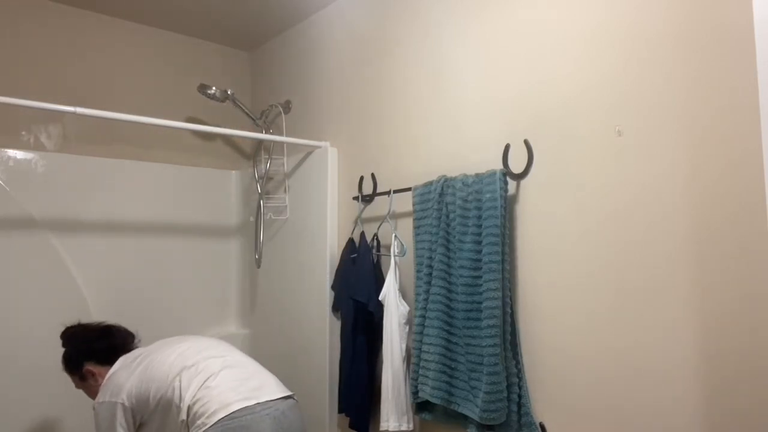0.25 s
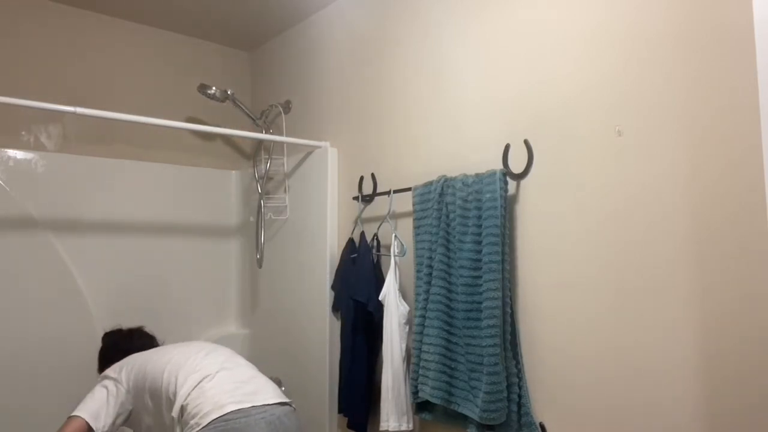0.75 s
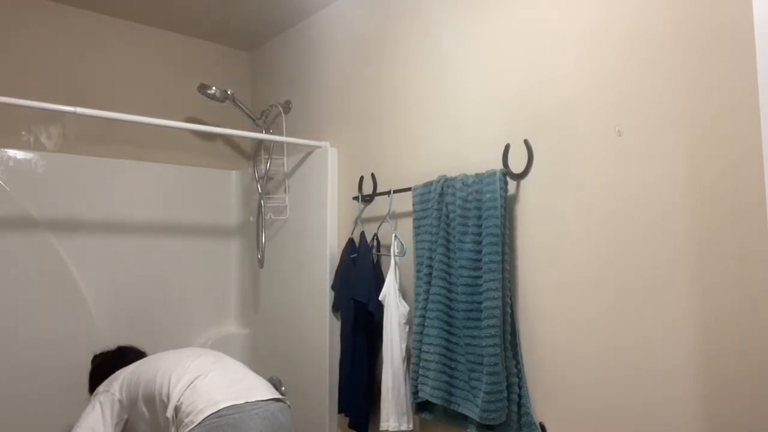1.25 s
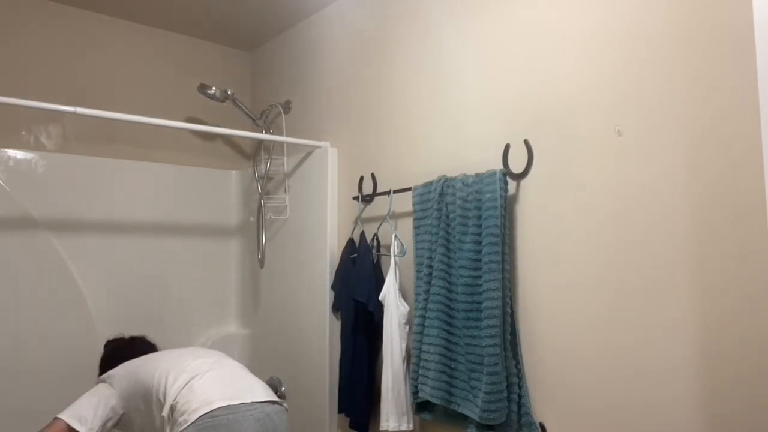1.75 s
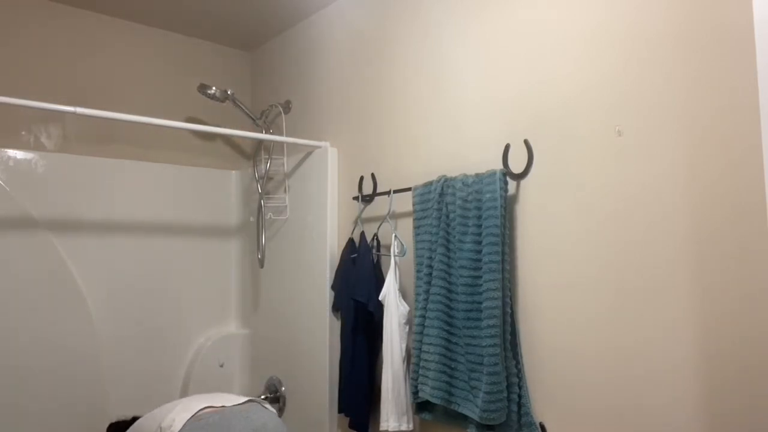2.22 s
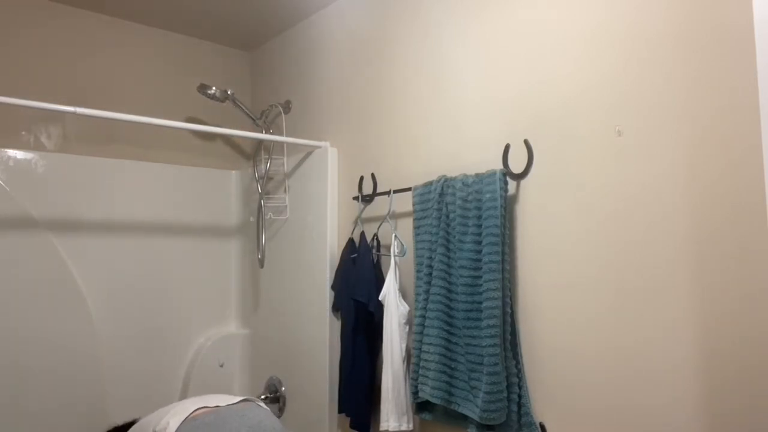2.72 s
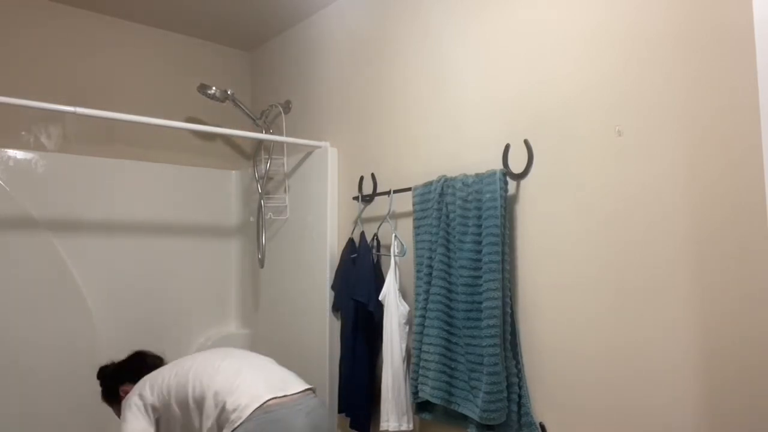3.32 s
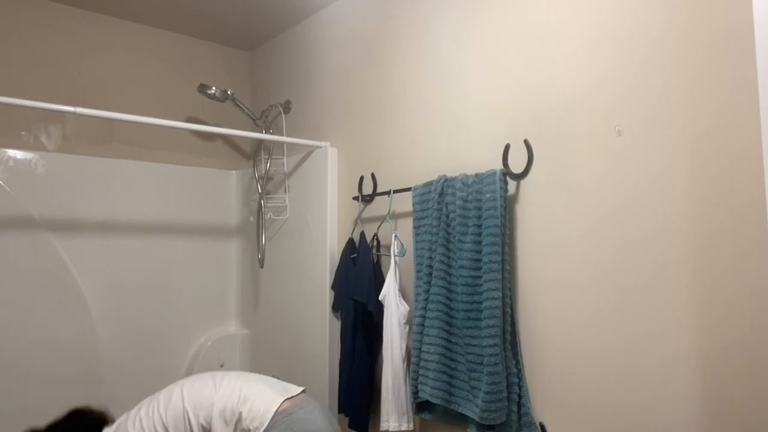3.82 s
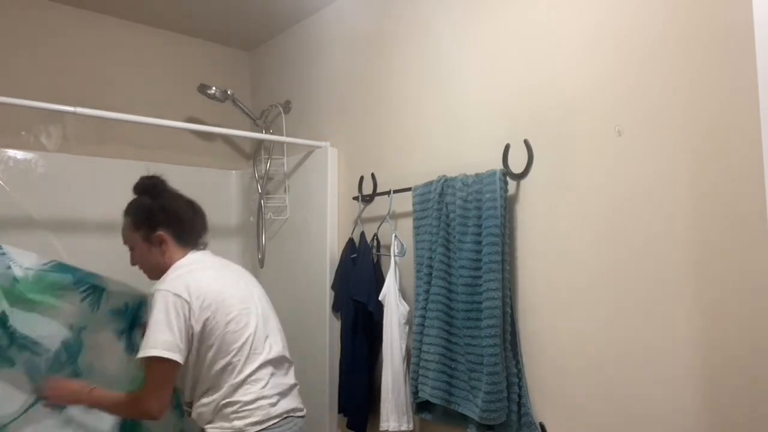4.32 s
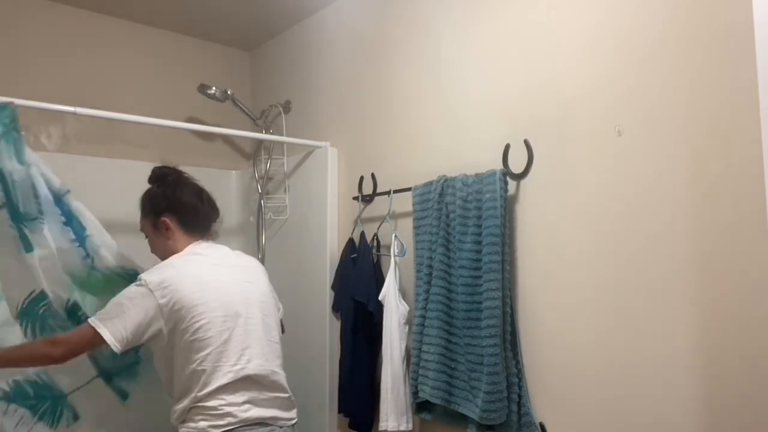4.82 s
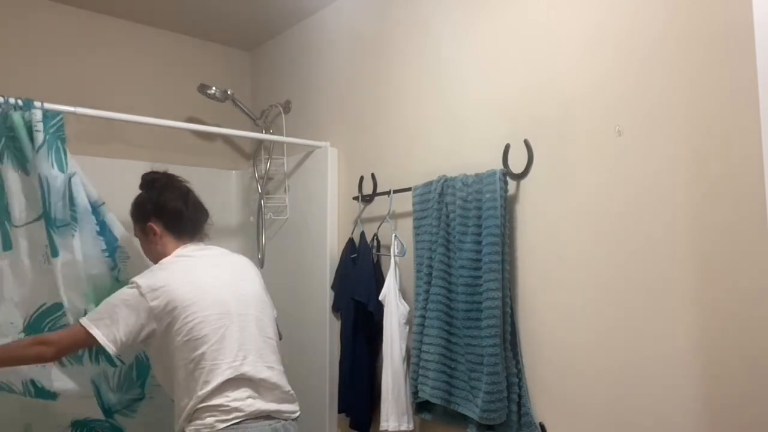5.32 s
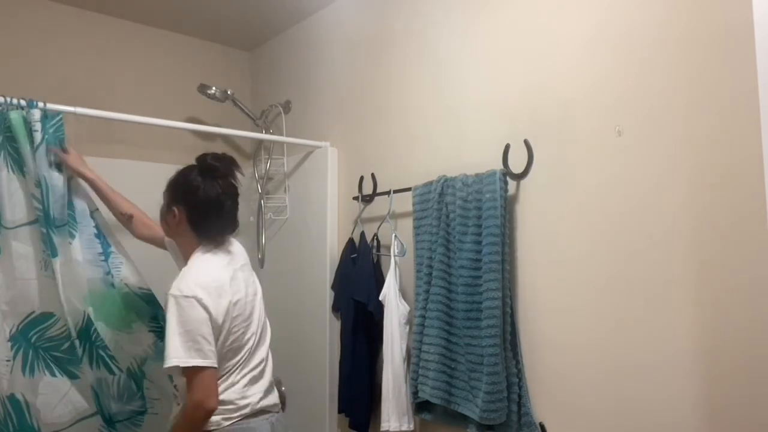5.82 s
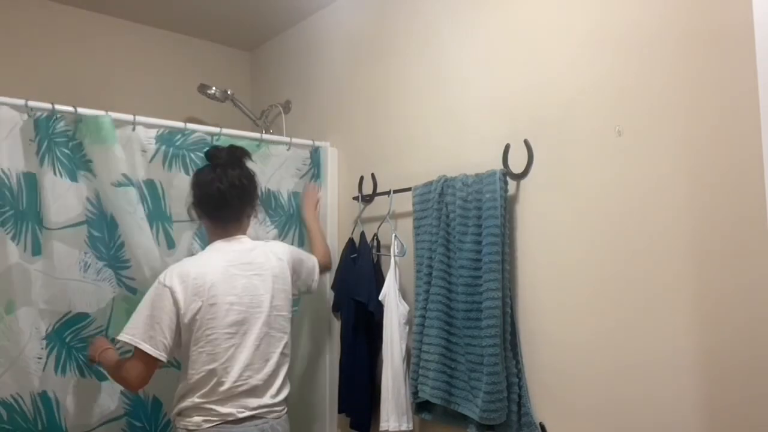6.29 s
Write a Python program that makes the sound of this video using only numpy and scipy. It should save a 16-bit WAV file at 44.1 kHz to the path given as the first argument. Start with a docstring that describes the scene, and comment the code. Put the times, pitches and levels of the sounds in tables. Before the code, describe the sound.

In a small bathroom someone bumps and shifts things in a hollow tub, then drags a plastic curtain closed with clicking rings.

```python
"""A small bathroom from its doorway, on two microphones; a fan hums faintly throughout as filtered noise and wavering tones.
Someone bends over a moulded bathtub, squeaks, shifts things about in it and knocks on its hollow wall: noise bursts
shaped by the wall's resonances, with swelling sine thumps; rubbing is a train of tiny slips. A wet scuff crosses the floor.
Light taps follow; then the plastic shower curtain is gathered and pulled shut in three pulls. Dense random snaps make
the crinkling, short bursts the clicks of its rings along the rod, and narrow bright bursts a few pings."""
import sys
import numpy as np
from scipy import signal
from scipy.fft import rfft, irfft, next_fast_len
from scipy.io import wavfile
from scipy.ndimage import uniform_filter1d

SR = 44100
rng = np.random.default_rng(int(sys.argv[2]) if len(sys.argv) > 2 else 0)


def transcribe(signal):
    """Save signal, clipped to [-1, 1], as a 16-bit WAV file at the path in sys.argv[1]."""
    frames = np.atleast_2d(signal).T
    limited = np.clip(frames, -1, 1)
    pcm = np.round(limited * 32767).astype(np.int16)
    wavfile.write(sys.argv[1], SR, pcm)


N = 288837   # length of the scene [samples]
TAIL = 16384   # length of each response [samples]
LEAD_S = .02   # room left ahead of each blow for its onset [s]
LEAD = int(LEAD_S * SR)
HZ = np.maximum(np.fft.rfftfreq(TAIL, 1 / SR), 1)
T = np.arange(N) / SR   # time in the scene [s]


def from_db(db):
    """Decibels to gain."""
    return np.exp(np.asarray(db) * (np.log(10) / 20))


def rms_one(x):
    """Scale to rms 1."""
    return x / np.sqrt(np.mean(x ** 2) + 1e-30)


def wander(steps):
    """Chance that takes a new value at every whole step, with straight lines between; spread about 1."""
    return 1.22 * np.interp(steps, np.arange(2000), rng.standard_normal(2000))


def drift(rate_hz):
    """Slow chance over the whole scene."""
    return wander(T * rate_hz)


def lift(modes):
    """Gain at each frequency from a set of resonances, whose powers add to a flat floor."""
    power = 1
    for hz, width_hz, lift_db in modes:
        peak = from_db(lift_db) ** 2 - 1
        power = power + peak / (1 + (2 * (HZ - hz) / width_hz) ** 2)
    return np.sqrt(np.abs(power))


def colour(points, modes=()):
    """Gain at each frequency: a broad outline lifted by resonances."""
    hz, db = np.transpose(points)
    return from_db(np.interp(np.log(HZ), np.log(hz), db)) * lift(modes)


# The three registers, boom, clack and crack: (lower edge [Hz], upper edge [Hz])
REGISTER_EDGES = [(62, 500), (500, 2300), (2300, 18000)]


def band(k):
    """Gain of the low, middle or high register; the three add up in power."""
    low, high = REGISTER_EDGES[k]
    return 1 / np.sqrt((1 + (low / HZ) ** 12) * (1 + (HZ / high) ** 12))


def causal(gain):
    """Minimum-phase response: nothing rings before it is struck."""
    cepstrum = irfft(np.log(gain / gain.max() + 1e-5))
    return np.exp(rfft(cepstrum * (1 + np.sign(np.fft.fftfreq(TAIL)))))


# Decay of the bathroom: (boom [s], clack [s], crack [s]) to fall 60 dB
ROOM_T60 = [0.42, 0.28, 0.28]
# Decay of the first reflections: (boom [s], clack [s], crack [s]) to fall 60 dB
EARLY_T60 = [0.14, 0.075, 0.105]
# Time for the first reflections to gather: (boom [s], clack [s], crack [s])
GATHER_TIME = [.0018, .001, .0012]
SNAP_T60_S = .025   # decay of the sound from a spot in plain view
LUMPS_DB, LUMPS_PER_S = 1.6, 300   # reflections come in bunches
GRAIN_DB, GRAINS_PER_S = 2.0, 2500
RIPPLE_DB, RIPPLE_HZ = 2.4, 130   # unevenness over pitch, fine and broad
SPOT_DB, SPOT_HZ = 1.7, 1100


def echoes(response, k, early_share, snap=0, contact_s=0):
    """What one spot of the room sends to two microphones: reflections gather, bunch and die away; energy 1."""
    t = np.arange(TAIL) / SR - LEAD_S
    gather = (1 + np.tanh(t / GATHER_TIME[k] / 2 - .5)) / 2
    fade = from_db(-60 * t / ROOM_T60[k]) + early_share * from_db(-60 * t / EARLY_T60[k])
    # a spot in plain view is heard before the room answers
    nearest = snap * (1 + early_share) * (t > 0) * from_db(-60 * t / SNAP_T60_S)
    energy = np.cumsum((gather * fade + nearest) ** 2)
    # a longer contact spreads the attack
    energy_before = np.interp(t - max(contact_s, 1 / SR), t, energy)
    shape = np.sqrt(np.abs(energy - energy_before))
    since = t.clip(0)
    lumps_db = LUMPS_DB * wander(since * LUMPS_PER_S) + GRAIN_DB * wander(since * GRAINS_PER_S)
    paths = rng.standard_normal((2, TAIL)) * shape * from_db(lumps_db)
    # each spot favours pitches of its own
    ripple_db = RIPPLE_DB * wander(HZ / RIPPLE_HZ) + SPOT_DB * wander(HZ / SPOT_HZ)
    ripple = from_db(np.minimum(HZ / 2000, 1) * ripple_db)
    return rms_one(irfft(rfft(paths) * response * ripple)) / np.sqrt(TAIL)


def burst_height(db):
    """Gain that gives a burst of energy 1 this level, as if spread over 20 ms."""
    return from_db(db) * np.sqrt(.02 * SR)


def blows(table, gain, early_share, snap=0):
    """Each contact sets the body ringing in three registers, from a spot of its own."""
    out = np.zeros((2, N + 2 * TAIL))
    for k in range(3):
        register_response = causal(gain * band(k))
        for s, contact_s, *columns in table:
            levels_db, tilts = columns[:3], columns[3:]
            response = register_response
            if k < len(tilts):   # where the wall is hit decides which modes speak
                response = causal(gain * band(k) * from_db(tilts[k] * np.log2(HZ)))
            at = max(int(s * SR), 0)
            burst = echoes(response, k, early_share, snap, contact_s)
            out[:, at:at + TAIL] += burst_height(levels_db[k]) * burst
    return out[:, LEAD:LEAD + N]


BOOM_LOSS = 0.59   # bass lost for each dB of hardness [dB]


def registers(strength_db, hardness_db, boom_db):
    """Boom, clack and crack of a contact in dB: the harder it is, the more it cracks and the less it booms."""
    boom = strength_db + boom_db - BOOM_LOSS * hardness_db
    return [boom, strength_db, strength_db + hardness_db]


STAY_S = .08   # the contact moves to a new spot this often
EARLY_SHARE = 0.25   # strength of the first reflections under rubbing, scuffing and crinkling


def friction(levels, gain, slips_per_s, spread_db, clump_db, snap=0):
    """Tiny slips of uneven size, in clumps; the contact moves from spot to spot, each with its own colour."""
    hop = int(STAY_S * SR)
    responses = [causal(gain * band(k)) for k in range(3)]
    sizes = from_db(spread_db * np.minimum(rng.exponential(1, N), 3)) * rng.choice([-1, 1], N)
    happens = rng.random(N) < slips_per_s / SR
    slips = levels * rms_one(sizes * happens * from_db(clump_db * drift(50)))
    slips = np.pad(slips, ((0, 0), (hop, 2 * hop)))
    passing = np.sin(np.pi * np.arange(2 * hop) / (2 * hop))   # crossfade of equal power
    out = np.zeros((2, N + 3 * hop + TAIL))
    for at in range(0, N + hop, hop):
        for k, here in enumerate(slips[:, at:at + 2 * hop] * passing):
            if np.abs(here).max() > 1e-5:
                spot = echoes(responses[k], k, EARLY_SHARE, snap)
                heard = signal.fftconvolve([here], spot, axes=1)
                out[:, at:at + heard.shape[1]] += heard
    return out[:, hop + LEAD:hop + LEAD + N]


# Outline of the fan's rush of air: (frequency [Hz], relative level [dB])
FAN_AIR = [(40, -21), (75, -15.5), (115, 2), (200, -7), (300, -5.5), (520, -13.5), (1000, -13.5),
           (1550, -13), (2100, -25), (4600, -18.5), (6000, -21.5), (15000, -26)]
# Tones of the fan: (frequency [Hz], level [dB])
FAN_TONES = [(241, -71.5), (1179, -100)]
AIR_DB, HUM_WAVER_DB = -71, 2.0


def fan():
    """A soft rush of air, as filtered noise, with a hum slightly wavering in level and phase."""
    noise = rng.standard_normal((2, N + TAIL - 1))
    air = signal.fftconvolve(noise, [irfft(causal(colour(FAN_AIR)))], "valid", axes=1)
    hum = 0
    for hz, db in FAN_TONES:
        phase = 2 * np.pi * hz * T + .45 * drift(12)
        hum = hum + from_db(db + HUM_WAVER_DB * drift(13.0)) * np.sqrt(2) * np.sin(phase)
    return from_db(AIR_DB) * rms_one(air) + hum * np.array([[1], [0]])


# Things pushed along the tub: (start [s], length [s], boom [dB], clack [dB], crack [dB])
TUB_STROKES = [(0.0, 0.054, -60, -60.5, -59), (0.256, 0.29, -65.5, -63.5, -74),
               (0.627, 0.095, -46.5, -47.5, -81), (0.765, 0.15, -57.5, -53.5, -64),
               (0.942, 0.082, -55.5, -47.5, -48), (1.038, 0.21, -61.5, -54, -62),
               (1.274, 0.12, -47, -50.5, -65), (1.406, .08, -53.5, -56.5, -75),
               (1.499, 0.021, -54, -42, -59.5), (1.535, 0.041, -57, -67, -74.5),
               (1.794, 0.35, -75.5, -67.5, -69.5), (2.188, 0.35, -66.5, -68, -75.5),
               (2.716, 0.22, -77.5, -73.5, -71), (2.951, 0.24, -79, -77.5, -78.5)]
STROKE_ATTACK_S, STROKE_RELEASE_S = 0.027, 0.006   # time to take hold; time to die by 1/e


def stroke_levels():
    """Each stroke takes hold, runs evenly and dies away; gain of the three registers over time."""
    power = 0
    for start, length, *levels_db in TUB_STROKES:
        hold = np.clip((T - start) / STROKE_ATTACK_S + .5, 0, 1)
        release = np.exp(-np.clip(T - start - length, 0, 1) / STROKE_RELEASE_S)
        power = power + np.outer(from_db(levels_db), hold * release) ** 2
    return np.sqrt(power)


# Outline of the tub: (frequency [Hz], relative level [dB])
TUB_OUTLINE = [(45, -24.5), (75, -14.5), (105, -5), (130, -2), (180, -2), (280, -5.5), (480, -15.5),
               (660, -14), (880, -3.5), (1350, -9.5), (2050, -14), (2900, -10), (4200, -13), (7000, -13.5),
               (11000, -15.5), (15500, -27)]
# Resonances of the plastic under rubbing and taps: (frequency [Hz], width [Hz], lift [dB])
PLASTIC_RESONANCES = [(125.8, 12, 1.3), (244.1, 5.3, 15), (683, 11, 15), (860, 150, 3), (1160, 47, 5),
                      (1300, 51, 3.4), (1478, 45, 7.9), (3650, 240, 9.6), (4850, 190, 9.3),
                      (7300, 590, 6.2)]
RUB_SLIPS_PER_S, RUB_SPREAD_DB, RUB_CLUMP_DB = 380, 6.0, 3.2


def rubbing():
    """Things pushed along the tub stick and slip, and the slips excite its plastic."""
    plastic = colour(TUB_OUTLINE, PLASTIC_RESONANCES)
    return friction(stroke_levels(), plastic, RUB_SLIPS_PER_S, RUB_SPREAD_DB, RUB_CLUMP_DB)


# Thin squeaks of plastic on plastic: (time [s], crack level [dB])
PLASTIC_SQUEAKS = [(0.02, -57.5), (0.076, -58), (0.463, -47)]
# Outline of the squeaks: (frequency [Hz], relative level [dB])
SQUEAK_OUTLINE = [(100, -5), (7000, -19.5), (10000, -7.5), (13000, -6), (15500, -8)]
SQUEAK_BODY_DB = -14   # their lower registers, relative to the crack
SOFT_CONTACT_S = .007   # time in contact of a bump or a squeak


def squeaks():
    """Plastic on plastic gives brief, thin bursts of noise with little body."""
    thin = []
    for s, db in PLASTIC_SQUEAKS:
        body_db = db + SQUEAK_BODY_DB
        thin.append((s, SOFT_CONTACT_S, body_db, body_db, db))
    return blows(thin, colour(SQUEAK_OUTLINE), early_share=0.84)


# Light taps and brushes of small things: (time [s], time in contact [s], strength [dB], hardness [dB])
LIGHT_TAPS = [(0.41, 0.016, -60.5, 8), (1.246, 0.013, -66.5, 12), (1.704, 0.0063, -62, -9),
              (2.213, 0.0045, -48.5, -15), (2.228, 0.011, -48.5, -12), (2.288, .001, -53.5, -15),
              (2.518, 0.009, -56.5, 0.5), (2.567, .004, -62.5, 12.5), (2.59, 0.011, -55.5, -1.5),
              (2.635, .012, -57, -1.5), (2.756, 0.021, -59.5, -0.5), (2.79, .018, -57.5, -0.5),
              (2.946, 0.0093, -65.5, 2.5), (2.995, 0.0094, -75.5, 12.5), (3.056, 0.0066, -53.5, -8),
              (3.243, 0.02, -63.5, 0), (3.264, 0.0038, -58, -11), (3.31, 0.011, -61.5, -1.5),
              (3.343, 0.0062, -78.5, 14.5), (3.422, 0.01, -88.5, 23.5), (3.477, 0.022, -56.5, -6),
              (3.565, 0.0043, -61.5, -9.5), (3.671, 0.024, -56.5, -6), (3.74, 0.021, -69.5, 4.5),
              (3.848, 0.018, -61.5, -1.5), (3.908, 0.0058, -58, -13), (3.958, 0.013, -61.5, -2),
              (3.996, 0.0098, -65.5, -1)]
# Outline of the taps: (frequency [Hz], relative level [dB])
TAP_OUTLINE = [(45.0, -24), (140.0, -11), (320.0, -4), (550.0, -23.5), (1000.0, -10), (1600.0, -10.5),
               (2100.0, 0.5), (2800.0, -5), (4000.0, -7), (5700.0, -8), (8000.0, -11), (13000.0, -13.5),
               (15500.0, -27)]
# Resonances of the small things themselves: (frequency [Hz], width [Hz], lift [dB])
TAP_RESONANCES = [(1605, 51, 12), (2852, 69, -2), (4050, 70, 10.5)]
TAP_BOOM_DB = -19   # bass above the strength, before hardness takes its share
KNOCK_SNAP = .6   # share of a tap or knock heard ahead of the room


def taps():
    """Small things touch the tub; their own resonances join those of the plastic."""
    light = [(s, contact_s, *registers(db, hardness, TAP_BOOM_DB)) for s, contact_s, db, hardness in LIGHT_TAPS]
    body = colour(TAP_OUTLINE, PLASTIC_RESONANCES + TAP_RESONANCES)
    return blows(light, body, early_share=1.7, snap=KNOCK_SNAP)


# A wet scuff across the tub floor, before the room: (time [s], level [dB], resonance [Hz])
WET_SCUFF = [(2.311, -75, 1090), (2.365, -51.5, 1130), (2.42, -48, 1235), (2.47, -57, 1140),
             (2.53, -70, 1205), (2.56, -76, 1270)]
SCUFF_WIDTH_HZ, SCUFF_SLIPS_PER_S = 170, 900
SCUFF_ROOM_DB = -9.5   # level at which the room carries it


def scuff(size=128):
    """Quick slips swell and fade through a resonance whose pitch wanders up and down along the scuff."""
    s, db, hz = np.transpose(WET_SCUFF)
    slips = rng.standard_normal(N) * (rng.random(N) < SCUFF_SLIPS_PER_S / SR)
    out, state = np.zeros(N), np.zeros(2)
    radius = np.exp(-np.pi * SCUFF_WIDTH_HZ / SR)
    first, last = int(s[0] * SR), int(s[-1] * SR)
    for i in range(first, last, size):
        turn = 2 * np.pi * np.interp(i / SR, s, hz) / SR
        poles = [1, -2 * radius * np.cos(turn), radius * radius]
        out[i:i + size], state = signal.lfilter([1, 0, -1], poles, slips[i:i + size], zi=state)
    out = out / np.std(out[first:last]) * from_db(np.interp(T, s, db))
    room = echoes(causal(band(1)), 1, EARLY_SHARE)
    return from_db(SCUFF_ROOM_DB) * signal.oaconvolve([out], room, axes=1)[:, LEAD:LEAD + N]


def thump(s, hz, db, swell_s):
    """The struck wall flexes in one mode, which swells in the hollow and dies."""
    t, at = np.arange(TAIL) / SR, int(s * SR)
    out = np.zeros(N + TAIL)
    shape = (t / swell_s * np.exp(1 - t / swell_s)) ** 2
    out[at:at + TAIL] = from_db(db) * shape * np.sin(2 * np.pi * hz * t)
    return out[:N] * np.array([[1], [.5]])


# Resonances of the tub's wall: (frequency [Hz], width [Hz], lift [dB])
WALL_RESONANCES = [(105, 14, 9), (147, 42, 8.5), (182, 20, 7), (295, 200, 5.5), (817, 110, 11.5),
                   (957, 60, 11), (1150, 13, 14), (1257, 71, 15), (1396, 33, 12), (1550, 60, 13),
                   (1611, 34, 9.5), (3950, 130, 9.5), (4780, 110, 7.5), (4810, 45, 9), (4980, 27, 13.5),
                   (6470, 54, 9.5), (6800, 46, 7.5)]
# Soft bumps of a limb against the tub: (time [s], boom [dB], tilt of the boom [dB per octave],
# pitch of the thump [Hz], thump above the boom [dB], time to swell [s])
LIMB_BUMPS = [(0.218, -48.5, 3, 151.4, 3.5, 0.014), (0.812, -49.5, 2, 146, 11, 0.013),
              (1.04, -63, 0, 119, 11, 0.013), (1.51, -40.5, 7, 150, 1, .015),
              (1.554, -56, -1, 116, 11, 0.013), (1.824, -65, 6.5, 150, 0.5, 0.017),
              (2.35, -58, -5, 131, 0, 0.015), (2.957, -65, -5.5, 121.7, 7.5, 0.013),
              (3.005, -69.5, -8, 125, 1, 0.013), (3.09, -55.5, 1, 154, 11.5, 0.015),
              (4.03, -68, -3, 124.5, 2.5, 0.01), (4.107, -56, -5, 119, 2, 0.029),
              (4.198, -36.5, -12, 122, 3, 0.018), (4.824, -50, -3, 150, 7, 0.029),
              (5.474, -48, 9.5, 238, 4, .012), (5.515, -56, 7, 245, 7, 0.016),
              (6.055, -48, 11, 233, 11, 0.012)]
THUD_FALL_DB = 14   # a soft contact is this much weaker in each higher register


def bumps():
    """A soft limb sets off mostly the boom, and a thump at the pitch of the place it hits."""
    wall, out = colour(TUB_OUTLINE, WALL_RESONANCES), 0
    for s, db, tilt, thump_hz, thump_db, swell_s in LIMB_BUMPS:
        contact = (s, SOFT_CONTACT_S, db, db - THUD_FALL_DB, db - 2 * THUD_FALL_DB, tilt)
        out = out + blows([contact], wall, early_share=2.8)
        out = out + thump(s, thump_hz, db + thump_db, swell_s)
    return out


# Hard knocks on the tub and the rattles after them: (time [s], time in contact [s], strength [dB],
# boom above the strength [dB], crack above the strength [dB], tilt of the clack [dB per octave],
# pitch of the clack [Hz], pitch of the thump [Hz], thump above the strength [dB], time to swell [s])
WALL_KNOCKS = [(0.511, 0.0065, -33.5, -12.5, -7.5, 4, 1547, 436.6, -5, 0.023),
               (0.521, 0.0088, -30.5, -7, -3, -12, 910, 128.6, 0, 0.02),
               (0.567, 0.0039, -25, -8.5, -8, 9.5, 1084, 256.3, -6.5, 0.015),
               (0.575, .008, -26.5, -9, -11.5, 3, 1410, 140.8, 2, 0.0095),
               (0.584, .012, -31, -12, -10.5, -11.5, 644, 554, -14, 0.008),
               (0.678, 0.0077, -31.5, -9.5, -9.5, 7.5, 1200, 199.6, -12, 0.02),
               (0.853, .008, -39.5, -9, -3, -3, 1370, 142.9, -10, 0.022),
               (0.863, 0.0081, -32.5, -12.5, -13.5, 0.5, 813, 297.7, -9.5, 0.018),
               (0.893, 0.0029, -49, -2.5, -25, 2.5, 1090, 308, -9, 0.0065),
               (1.105, .015, -48.5, -23, -22, -4, 870, 130, -14, .015),
               (1.128, .002, -40, -15.5, -16, -2.5, 890, 324, -8, 0.0082),
               (1.19, 0.007, -46.5, -15, -14, -3.5, 910, 130, -10, 0.0078),
               (1.293, 0.0073, -53, -6, -21, 1, 1150, 220, -9, 0.0075),
               (1.33, .016, -48, -9, -15.5, -4.5, 930, 144.3, -5.5, 0.022),
               (1.487, 0.014, -39, -7, -11, 1, 1403, 395, -10, 0.025),
               (1.971, 0.0026, -22.5, -7, 0, -1, 946, 176.6, -3, 0.023),
               (1.976, 0.00086, -16.5, -10, -2, -0.5, 948, 105.2, -16, 0.034),
               (2.017, .003, -36.5, -8, -10.5, 2.5, 1180, 295.4, -5.5, .014),
               (2.027, 0.0071, -38.5, -3.5, 0, 0.5, 1470, 160, -2.5, .014),
               (2.08, .008, -47.5, -8.5, -18, 9, 1550, 119, -3.5, .01),
               (2.115, 0.0073, -41, -8, -1, -0.5, 1247, 103.8, -12.5, 0.022),
               (2.41, .004, -43.5, -14.5, -14.5, 10, 1190, 388, -14, 0.019),
               (2.459, .003, -48.5, -24, -12, 6.5, 1090, 157, -12.5, 0.01),
               (3.084, 0.0075, -35.5, -10, -3, 16.5, 1495, 301.4, -8.5, 0.013)]
# lighter blows miss the wall's lowest modes: dB per octave for each dB under a heavy one
HEAVY_BOOM_DB, BOOM_TILT_PER_DB = -34.5, 0.68
DEEPEST_TILT_DB = -3.5   # dB per octave of the boom under the heaviest blows
CLACK_WIDTH_HZ, CLACK_LIFT_DB = 50, 5
CLACK_RING_DB, CLACK_SWELL_S = -6, .006   # the mode nearest the blow: level above the strength, time to swell


def knocks():
    """Each knock thumps at the pitch of the place it hits and adds a ringing clack and a crack."""
    wall, out = colour(TUB_OUTLINE, WALL_RESONANCES), 0
    for s, contact_s, db, boom, crack, tilt, clack_hz, thump_hz, thump_db, swell_s in WALL_KNOCKS:
        boom_tilt = max(BOOM_TILT_PER_DB * (HEAVY_BOOM_DB - db - boom), DEEPEST_TILT_DB)
        contact = (s, contact_s, db + boom, db, db + crack, boom_tilt, tilt)
        place = wall * lift([(clack_hz, CLACK_WIDTH_HZ, CLACK_LIFT_DB)])
        out = out + blows([contact], place, early_share=2.7, snap=KNOCK_SNAP)
        out = out + thump(s, thump_hz, db + thump_db, swell_s)
        out = out + thump(s, clack_hz, db + CLACK_RING_DB, CLACK_SWELL_S)
    return out


def tub():
    """Everything that touches the hollow tub adds up."""
    return rubbing() + squeaks() + taps() + scuff() + bumps() + knocks()


# A ring that swings free: (time [s], pitch [Hz], level [dB])
RING_PINGS = [(4.876, 4900, -53), (5.028, 4360, -48), (5.112, 4700, -49.5), (5.284, 4700, -41)]
PING_WIDTH_HZ = 620
SNAP = 0.75   # share of the curtain's sounds heard ahead of the room


def pings():
    """Short, bright rings of metal, heard through the room."""
    out = np.zeros((2, N + TAIL))
    for s, hz, db in RING_PINGS:
        metal = causal(1 / (1 + (2 * (HZ - hz) / PING_WIDTH_HZ) ** 2))
        at = int(s * SR) - LEAD
        out[:, at:at + TAIL] += burst_height(db) * echoes(metal, 2, 3, SNAP)
    return out[:, :N]


# Outline of the curtain: (frequency [Hz], relative level [dB])
CURTAIN_OUTLINE = [(45.0, -40), (120.0, -12), (200.0, -11), (420.0, -9.5), (700.0, -6.5), (1000.0, 2),
                   (1500.0, -1.5), (1950.0, -10.5), (2600.0, 0.5), (3600.0, 10), (5700.0, 4), (8000.0, 6.5),
                   (13000.0, 0), (15500.0, -7)]
# Resonances of the curtain and its rod in the stall: (frequency [Hz], width [Hz], lift [dB])
CURTAIN_RESONANCES = [(116.7, 5.8, 7), (237.5, 9.7, 16), (679, 50, 8), (926, 51, 5), (1224, 24, 7.5),
                      (1316, 57, 5), (1508, 110, 7.5), (4790, 230, 4.5), (6400, 280, 3)]
# Curtain rings hitting the rod and each other: (time [s], time in contact [s], strength [dB], hardness [dB])
RING_CLICKS = [(4.101, 0.0011, -39.5, -4.5), (4.365, .001, -42.5, -4), (4.47, 0.0058, -52, 3),
               (4.778, .016, -38.5, -6), (4.821, 0.017, -44, -1), (4.924, 0.009, -35.5, -4),
               (4.964, 0.0085, -43, 3), (5.187, 0.0081, -37, -3), (5.304, 0.01, -45.5, 9),
               (5.36, 0.016, -55.5, 13), (5.422, 0.0021, -38, -7), (5.452, 0.013, -51, 1),
               (5.487, 0.019, -36, -14), (5.517, 0.01, -36.5, -11.5), (5.585, 0.01, -42.5, -15),
               (5.651, 0.0055, -40, -6.5), (5.68, 0.012, -41, -7), (5.796, 0.0036, -43, -12),
               (5.837, 0.0043, -42, -3), (5.88, 0.00093, -39.5, -7), (5.955, .01, -40, -3.5),
               (6.005, 0.0049, -37, -1), (6.066, 0.015, -31, -4), (6.095, 0.00092, -26.5, -2.5),
               (6.207, 0.0093, -31.5, -2.5), (6.236, 0.0059, -36, 4.5), (6.30, 0.0072, -44.5, 4.5),
               (6.352, 0.019, -43, -11), (6.447, .001, -45.5, 2)]
RING_BOOM_DB = -15   # bass above the strength, before hardness takes its share


def ring_clicks():
    """Each ring's blow excites the curtain and its rod in a short burst."""
    clicks = [(s, contact_s, *registers(db, hardness, RING_BOOM_DB)) for s, contact_s, db, hardness in RING_CLICKS]
    return blows(clicks, colour(CURTAIN_OUTLINE, CURTAIN_RESONANCES), early_share=2.0, snap=SNAP)


# Three pulls of the curtain, before the trims below: (time [s], crinkling of the sheet [dB],
# sliding of the rings [dB], flapping of the sheet [dB])
CURTAIN_PULLS = [
    [(4.03, -56, -60, -70), (4.05, -48, -59.5, -72), (4.09, -45, -56, -64), (4.125, -37, -39, -48.5),
     (4.22, -38, -42.5, -51.5), (4.27, -49.5, -48, -61), (4.345, -49.5, -48.5, -63.5),
     (4.385, -45, -41.5, -65), (4.43, -59.5, -62, -73), (4.51, -63, -63, -69)],
    [(4.56, -51.5, -62, -72), (4.63, -47.5, -47.5, -67), (4.73, -45, -50.5, -58), (4.82, -39, -39, -54.5),
     (4.955, -40.5, -40.5, -54), (5.01, -47, -46.5, -51), (5.125, -49, -45.5, -50.5),
     (5.2, -39.5, -40, -46), (5.265, -45.5, -41, -50), (5.4, -50, -48, -52), (5.5, -44, -44, -55),
     (5.62, -62, -52.5, -53), (5.7, -57.5, -50.5, -54), (5.755, -75, -64, -54.5)],
    [(5.8, -58, -51, -53.5), (5.9, -46, -47.5, -52.5), (5.99, -43.5, -43.5, -47.5), (6.05, -37, -36, -45),
     (6.12, -32.5, -34.5, -43), (6.185, -37.5, -37, -57), (6.24, -35, -41, -49), (6.275, -47, -45.5, -53),
     (6.35, -48.5, -49, -56), (6.42, -58, -55.5, -72), (6.52, -49.5, -50, -67)],
]
CRINKLE_DB, SLIDE_DB = 1, 1   # trims of the sheet and of the rings
CRINKLES_PER_S, CRINKLE_SPREAD_DB, CRINKLE_CLUMP_DB = 420, 5.0, 1.5
CATCH_DB, CATCHES_PER_S = 1.45, 15   # folds of the sheet catch and let go, each register in its own way


def pulls():
    """The sheet snaps and flaps as its rings slide: flapping low, sliding in the middle, crinkling high."""
    s, crinkle_db, sliding_db, flap_db = np.concatenate(CURTAIN_PULLS).T
    levels_db = []
    for db in (flap_db, sliding_db + SLIDE_DB, crinkle_db + CRINKLE_DB):
        levels_db.append(np.interp(T, s, db) + CATCH_DB * drift(CATCHES_PER_S))
    levels = (T >= s[0]) * from_db(levels_db)
    plastic = colour(CURTAIN_OUTLINE, CURTAIN_RESONANCES)
    return friction(levels, plastic, CRINKLES_PER_S, CRINKLE_SPREAD_DB, CRINKLE_CLUMP_DB, snap=SNAP)


def curtain():
    """The sheet crinkles and flaps while its rings slide, click and ping."""
    return pings() + ring_clicks() + pulls()


# The two microphones: (frequency [Hz], left over right [dB], lead of the left [rad], likeness [0-1])
MICROPHONE_PAIR = [(85, 1.5, -1.3, .7), (150, 5.5, -2.1, .5), (330, 7, -2.1, .35), (680, .4, -1.9, .92),
                   (1050, 0, -1.7, .92), (1420, .2, -.5, .7), (1750, 1.5, -.4, .15),
                   (2030, .1, -3.12, .993), (2580, .1, -3.13, .993), (3000, 1.2, 0, .13),
                   (3550, 4, 2.3, .5), (4100, 1.8, -1, .3), (4700, 2.9, -.3, .65), (5250, 2.1, -.7, .3),
                   (5700, 1, 3.1, .7), (5950, 1, 3.1, .75), (6400, 2.3, -.5, .2), (7200, 3.2, 2.6, .5),
                   (8200, 3.3, -2.1, .05), (9200, 3.7, -.9, .2), (10500, 4, 2.3, .45),
                   (12500, 3.5, .4, .55), (15000, 8, -1.9, .2)]


def microphones(field):
    """The right microphone shares part of the left one's sound, shifted in phase."""
    hz, balance_db, lead, likeness = np.transpose(MICROPHONE_PAIR)
    size = next_fast_len(N + TAIL)
    f = np.fft.rfftfreq(size, 1 / SR)
    shared = np.interp(f, hz, np.clip(likeness, 0, 1) * np.exp(-1j * lead))
    ratio = from_db(np.interp(f, hz, balance_db))
    left, other = rfft(field, size)
    right = shared * left + np.sqrt(np.maximum(1 - np.abs(shared) ** 2, 0)) * other
    pair = np.array([ratio * left, right]) * np.sqrt(2 / (1 + ratio ** 2))
    return irfft(pair, size)[:, :N]


def scene():
    """The bathroom heard from its doorway."""
    return microphones(fan() + tub() + curtain())


# the recorder turns down its quietest moments: threshold, dB per dB, limit
SUPPRESS_BELOW_DB, SUPPRESS_RATIO, SUPPRESS_MOST_DB = -61, 0.37, 5
SUPPRESS_WINDOW_S, CUTOFF_HZ = .03, 15750


def record(dry):
    """A mild noise suppressor deepens the gaps; the top is cut steeply."""
    power = uniform_filter1d(np.mean(dry ** 2, axis=0), int(SUPPRESS_WINDOW_S * SR))
    level_db = 10 * np.log10(np.abs(power) + 1e-12)
    cut_db = np.clip(SUPPRESS_RATIO * (SUPPRESS_BELOW_DB - level_db), 0, SUPPRESS_MOST_DB)
    top_cut = signal.ellip(10, .2, 80, CUTOFF_HZ, fs=SR, output="sos")
    return signal.sosfilt(top_cut, dry * from_db(-cut_db))


dry = scene()
out = record(dry)
transcribe(out)
```